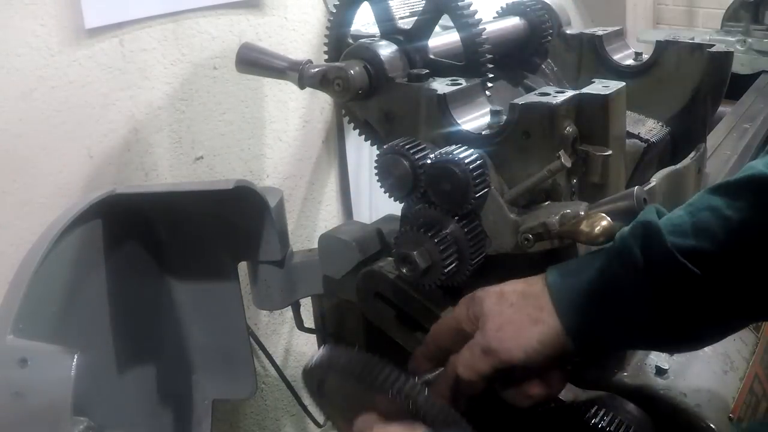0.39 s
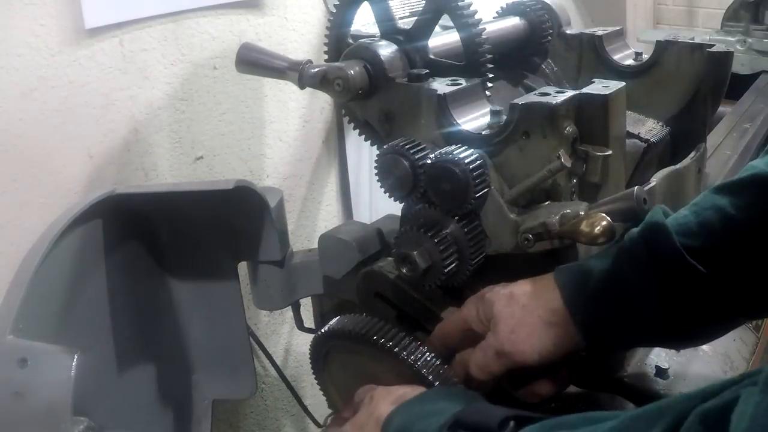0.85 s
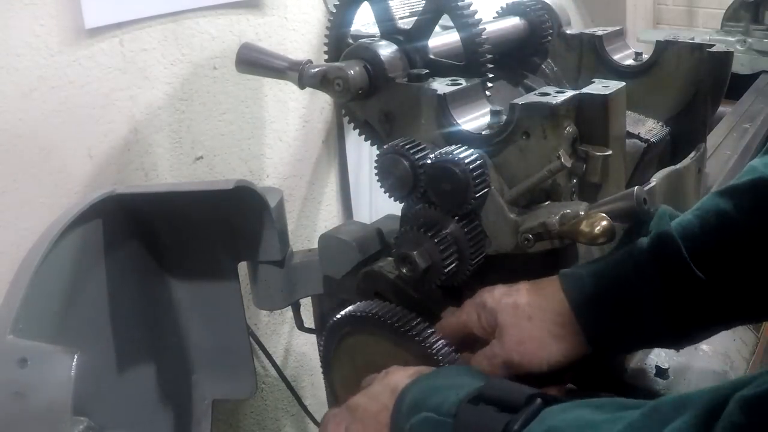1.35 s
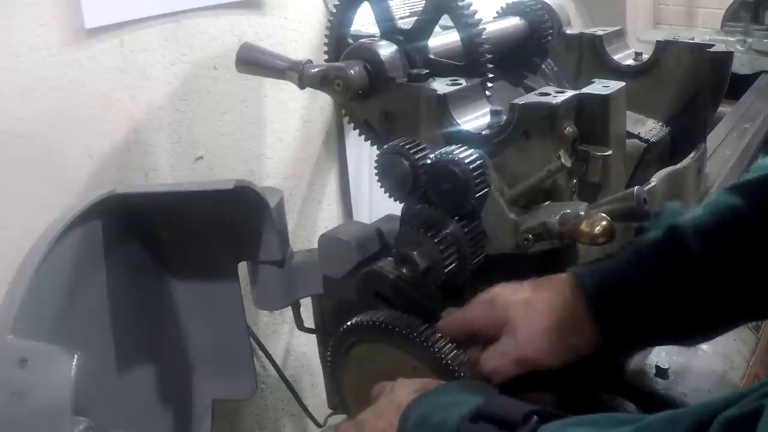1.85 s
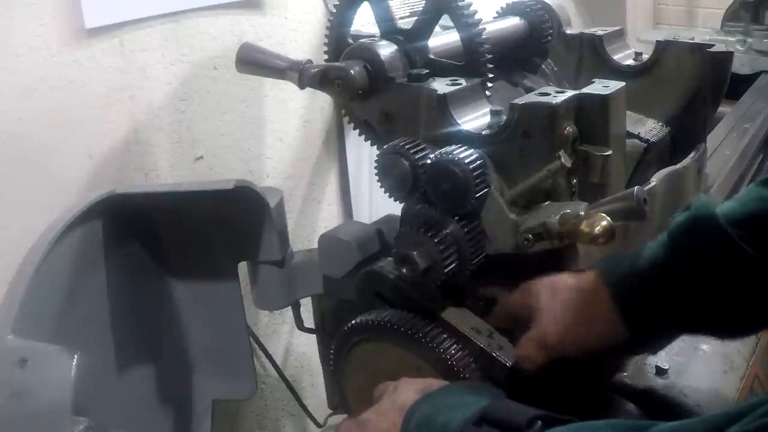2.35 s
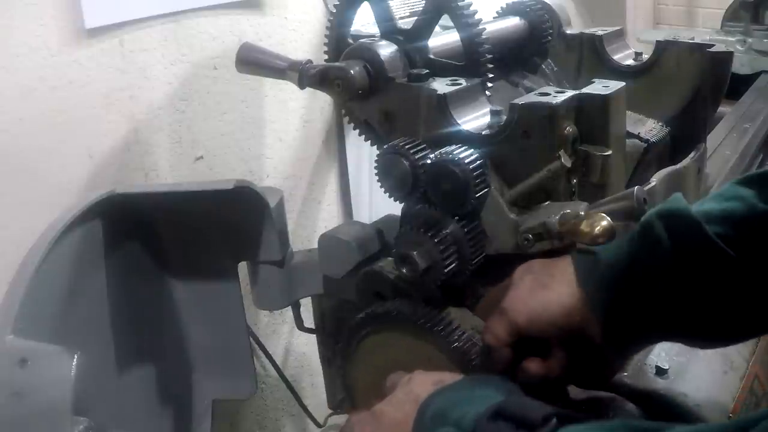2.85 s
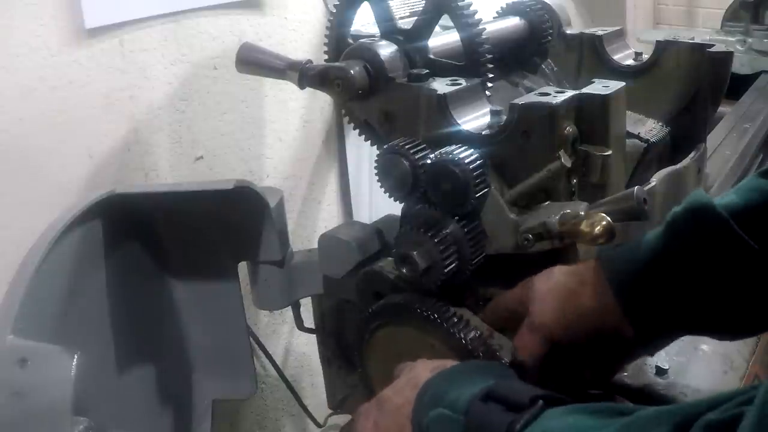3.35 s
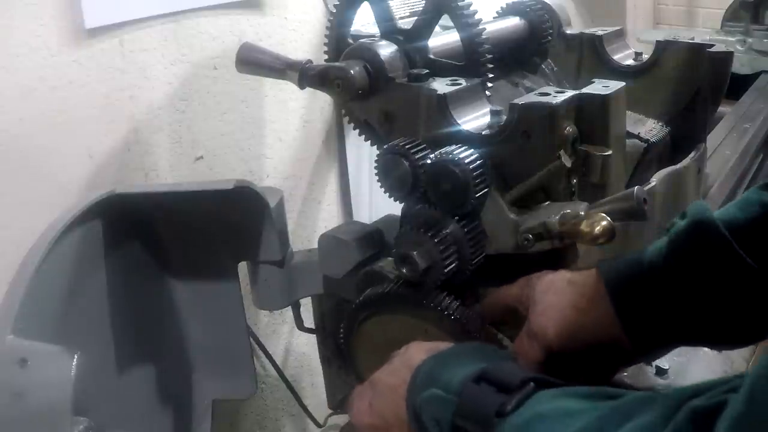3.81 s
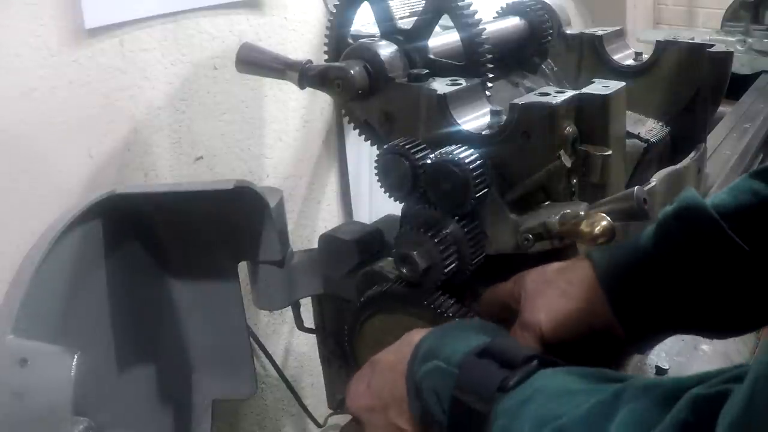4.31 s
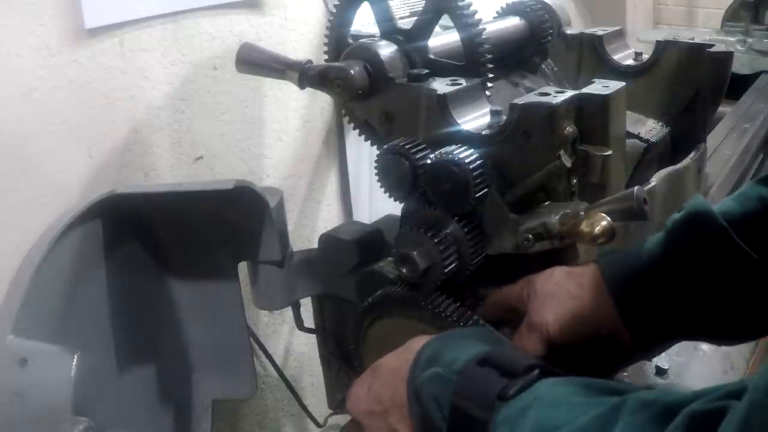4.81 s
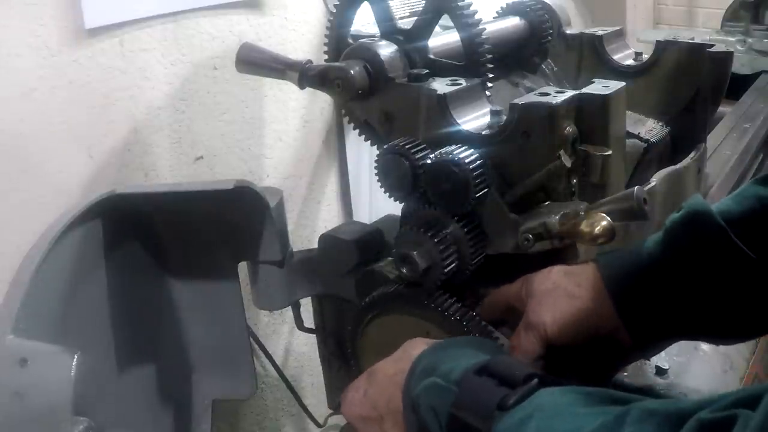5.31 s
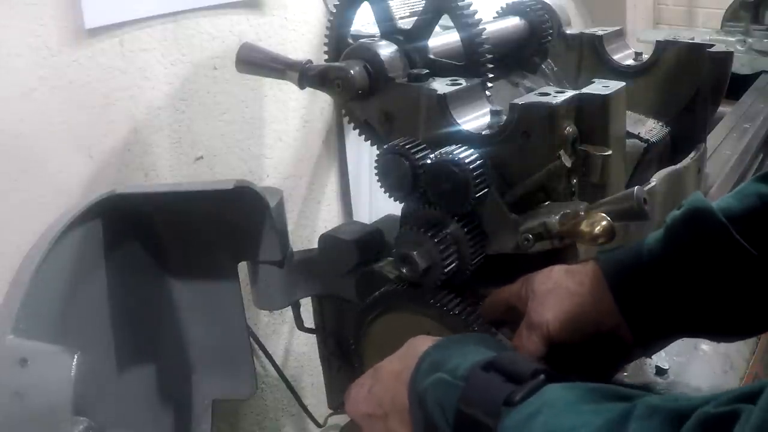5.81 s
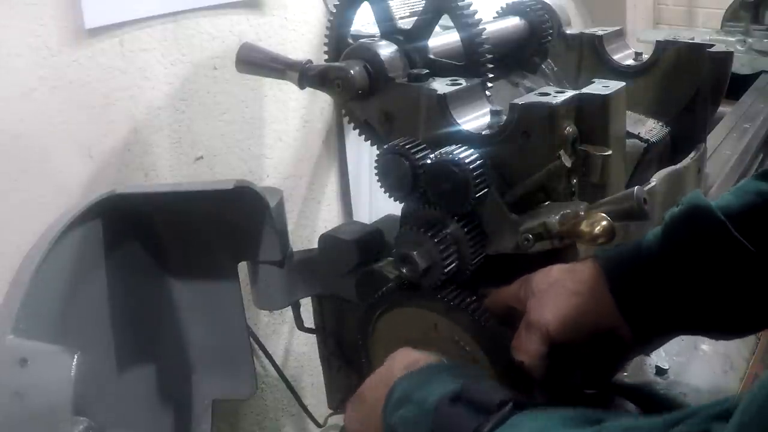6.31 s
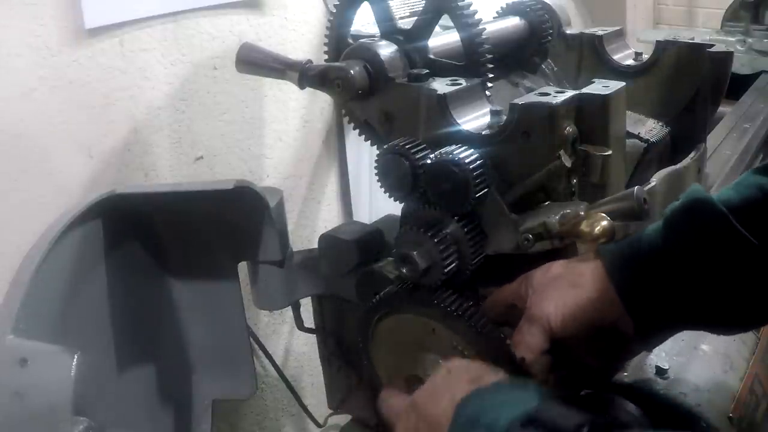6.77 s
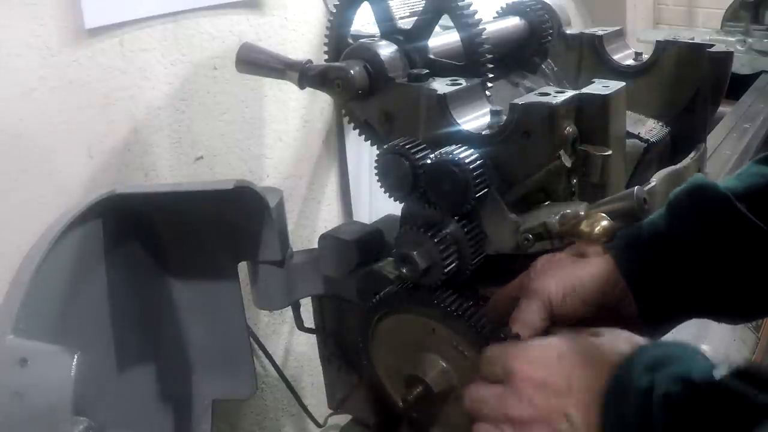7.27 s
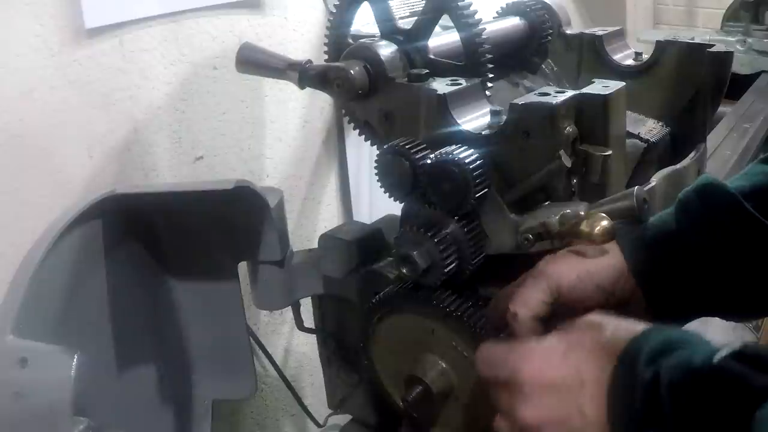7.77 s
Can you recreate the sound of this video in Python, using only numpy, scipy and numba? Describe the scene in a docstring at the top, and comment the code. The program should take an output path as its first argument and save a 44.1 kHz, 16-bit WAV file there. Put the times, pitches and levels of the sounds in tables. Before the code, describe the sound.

In a quiet workshop, hands fit a heavy metal gear onto a machine. Bright clinks and knocks come in the first second, then the hardest clack just before two seconds with gritty scraping and a soft puff of air. Sparse small taps, faint slides and cloth rustle follow, with one more sharp clink past six seconds. Close, slightly muffled microphone, steady hiss and faint room rumble.

```python
"""In a quiet workshop, hands fit a large cast gear onto the change-gear bracket of a lathe, close to a microphone.
Impacts excite decaying modes of the gear, a steel collar, the bracket and the machine frame, with cracks and thuds
of noise. Sliding metal is grainy friction noise that also drives some of these modes; sleeves, palms and pushed air
are shaped noise. The walls return a diffuse tail, and steady hiss over a faint room rumble lies under all."""
import sys
import numpy as np
from scipy import signal
from scipy.fft import rfft, irfft, next_fast_len
from scipy.io import wavfile
from scipy.ndimage import uniform_filter1d
from numba import njit

SR = 44100
rng = np.random.default_rng(int(sys.argv[2]) if len(sys.argv) > 2 else 0)


def gain_from_db(level_db):
    """Convert decibel levels to linear amplitude factors (20 dB per decade)."""
    decades = np.asarray(level_db, float) / 20
    return 10 ** decades


def to_wav(sig):
    """Store sig (one row per channel, or 1-D mono) as 16-bit WAV at the path in sys.argv[1].

    Samples outside -1..1 are clipped; the rate is SR.
    """
    pcm = np.clip(np.atleast_2d(sig), -1, 1) * 32767
    pcm = np.round(pcm).astype(np.int16)
    wavfile.write(sys.argv[1], SR, pcm.T)  # frames by channels


N = 358974  # length [samples]

# Levels in the tables are relative: the functions weight them further.
# Knocks on the bracket: (time [s], crack level [dB], brightness [dB/octave], ring level [dB], frame level [dB])
BRACKET_KNOCKS = [(0.1581, -45.5, -6, -62.5, -55.5), (0.525, -7.5, -2.5, -37, -39.5),
                  (0.5893, -13.5, -2.5, -45, -52), (1.6704, -54, -6, -73, -53.5),
                  (1.785, -36, 10.5, -78.5, -67), (1.797, -50, 3, -83.5, -56.5),
                  (1.8345, -46, -21, -70, -40.5), (1.861, -42.5, 15, -83.5, -76),
                  (1.906, -48.5, -2.5, -69.5, -54), (1.9411, 1.5, 4, -29.5, -34.5),
                  (1.9573, -13, 1, -36, -68), (2.755, -39.5, -6.5, -70, -62),
                  (2.8546, -23.5, -8, -49.5, -49.5), (3.0975, -38.5, -16.5, -81, -60.5),
                  (3.1603, -29.5, -5.5, -74, -51.5), (4.7211, -52, -5.5, -87, -57),
                  (6.3341, -36, -5, -57, -65), (6.6247, -45.5, 5, -85.5, -74),
                  (7.0485, -29, -5.5, -80, -43), (8.0803, -55, 2, -85, -57.5)]
# Gear clinks on the bracket:
# (time [s], crack level [dB], brightness [dB/octave], low ring level [dB], high ring level [dB])
GEAR_CLINKS = [(0.329, -41, -9.5, -66, -50), (0.386, -39, -8, -82, -55), (0.4987, -26.5, -10, -40, -19.5),
               (0.7856, -23, -2, -40.5, -49), (0.9931, -52, -11.5, -63, -73), (1.0914, -9, 9, -45, -26.5),
               (4.1097, -17.5, -1.5, -45, -61), (4.6764, -41, -9, -66, -88),
               (4.8816, -41, -9.5, -43, -81.5), (6.343, -7, 1.1, -38, -68)]
# Collar taps its stud: (time [s], crack level [dB], low ring level [dB], high ring level [dB], frame level [dB])
COLLAR_TAPS = [(3.5527, -43.5, -72.5, -60.5, -56), (3.756, -45, -71.5, -63, -45.5),
               (3.995, -41.5, -55, -72, -50), (5.2515, -55, -72, -49.5, -53),
               (5.3074, -38.5, -67, -62, -48), (5.7865, -31.5, -58, -47.5, -38),
               (6.0343, -32.5, -64, -46.5, -52), (6.0484, -16.5, -49.5, -53.5, -40),
               (6.099, -44.5, -45, -50, -41), (6.215, -55, -59, -54, -61), (6.275, -75, -85, -55, -70),
               (6.302, -75, -82, -50, -76), (6.868, -52, -74, -58, -55), (6.9032, -34, -55, -55.5, -42.5),
               (7.988, -69, -86.5, -69, -73.5)]
# Fingers close on the collar and damp its ring: (time [s])
COLLAR_GRIP_TIMES = [5.372, 5.96, 6.258]
# Metal slides on metal: (start [s], hold [s], level [dB], treble relative to it [dB])
METAL_SLIDES = [(0, 0.06, -57.5, -18), (0.13, 0.02, -60, -22), (0.429, 0.078, -48, -21),
                (0.686, 0.056, -59, -8), (1.052, 0.0093, -53, -15), (1.605, 0.096, -64.5, -4),
                (1.794, 0.019, -52.5, -4), (1.83, 0.068, -50, -1), (1.923, .03, -42, 11.5),
                (3.111, 0.062, -49.5, 13), (3.174, .11, -49.5, -10), (3.75, .03, -63, 4),
                (4.0, .11, -56.5, -0.5), (4.636, 0.031, -62.5, -2), (5.252, .012, -60, -7.5),
                (5.316, 0.0062, -49, -15), (5.748, 0.029, -54.5, -16), (6.056, 0.076, -53.5, -3),
                (6.92, .012, -51, -14), (7.15, 0.24, -79, 15.5), (7.308, .14, -63, -5)]
# A dragged edge keeps the gear rim singing: (start [s], hold [s], level [dB])
RIM_DRAGS = [(.455, 0.046, -43), (1.055, 0.0074, -58)]
# A dragged edge keeps the collar singing: (start [s], hold [s], level [dB])
COLLAR_DRAGS = [(3.545, 0.004, -59), (4.03, .06, -56.5), (5.25, 0.01, -56), (5.31, 0.028, -50),
                (5.755, 0.052, -52)]
# Palms on the iron make the frame rumble: (time [s], level [dB])
PALM_LEVELS = [(0.0, -60), (0.43, -62.5), (0.63, -51), (0.81, -67), (1.59, -65.5), (1.97, -57), (2.38, -71),
               (2.99, -66), (3.35, -59), (5.46, -76), (5.71, -69.5), (5.87, -71), (6.3, -54.5),
               (6.6, -89.5), (6.89, -68.5), (7.03, -55.5), (7.73, -74.5), (8.14, -68.5)]
# Sleeves brush past: (start [s], hold [s], level [dB])
SLEEVE_BRUSHES = [(0, 0.043, -58.5), (.26, 0.059, -61), (2.22, 0.1, -63), (2.6, 0.36, -61.5),
                  (7.3, 0.043, -67), (7.465, .012, -61.5), (7.62, 0.046, -59), (7.78, .012, -59.5),
                  (7.905, .012, -62.5), (8.1, .04, -63.5)]
# Air pushed onto the microphone: (time [s], level [dB])
AIR_LEVELS = [(1.9, -46), (1.974, -56), (2.166, -39.5), (2.272, -54.5), (2.55, -58.5)]

# Modes of the gear: (frequency [Hz], level [dB], decay by 60 dB [s])
GEAR_MODES = [(2440, 5, .05), (2449, -5, .3), (2484, -3, .34), (4145, -29, .28), (6207, -8, .22),
              (6240, 4, .06), (6268, -12, .26)]
# Modes of the steel collar: (frequency [Hz], level [dB], decay by 60 dB [s])
COLLAR_MODES = [(1701, 0, .5), (4153, 0, .38), (4350, -14, .02), (7480, -12, .12)]
# Modes of the bracket: (frequency [Hz], level [dB], decay by 60 dB [s])
BRACKET_MODES = [(1352, 0, .27), (1388, -3, .2), (1795, -7, .2), (1914, -7, .12), (2985, -13, .2),
                 (3425, -9, .25), (5090, -8, .06), (5276, 0, .17), (5300, -10, .4)]
# Modes of the machine frame: (frequency [Hz], level [dB], decay by 60 dB [s])
FRAME_MODES = [(114, -6, .35), (257, -7, .3), (305, -11, .15), (389, -5, .5), (435, -10, .1),
               (560, -14, .08)]
# Teeth and casting walls, damped almost at once: (frequency [Hz], level [dB], decay by 60 dB [s])
CASTING_MODES = [(1840, 0, .04), (2080, -4, .03), (2400, -1, .04), (3430, -3, .03), (4480, -5, .025),
                 (5450, -4, .025), (6250, -1, .03)]

# Spectrum of sliding metal: (frequency [Hz], relative density [dB])
SLIDE_SPECTRUM = [(300, -18.5), (600, -3), (1200, -1.5), (2000, -5.5), (2600, 3.5), (3000, -13.5),
                  (3500, -5.5), (4500, -5.5), (6300, -4), (9000, -13.5)]
# Spectrum of rustling cloth: (frequency [Hz], relative density [dB])
RUSTLE_SPECTRUM = [(1760, -33), (3000, -12), (3810, -7.5), (4620, -10), (5260, -3.5), (7120, -1.5),
                   (9000, -6.5), (11700, -42), (19800, -120)]
# Spectrum of palm rumble and thuds: (frequency [Hz], relative density [dB])
RUMBLE_SPECTRUM = [(60, -19.5), (115, 2), (170, -2), (255, 5.5), (390, 0.5), (500, -6), (700, -14.5),
                   (1100, -16), (2500, -60.5)]
# Spectrum of impact cracks: (frequency [Hz], relative density [dB])
CRACK_SPECTRUM = [(300, -30), (1000, -17), (1800, 7.5), (4000, 4), (6500, 5), (10000, 3), (13000, -14),
                  (15500, -8)]
# Spectrum of the steady noise common to both channels: (frequency [Hz], relative density [dB])
ROOM_SPECTRUM = [(12, -32.5), (20, 6.5), (47, 2), (122, 0), (185, -6), (393, -16.5), (439, -15.5),
                 (686, -20.5), (3170, -24), (5090, -22.5), (6540, -24), (7110, -20.5), (9130, -26.5),
                 (14300, -26.5), (15500, -29.5)]
# Spectrum of the faint steady hiss in opposite phase in the two channels:
# (frequency [Hz], relative density [dB])
SIDE_SPECTRUM = [(120, -31.5), (200, -2), (812, 1), (2250, -6), (6240, 0), (14400, 1), (15500, -17.5)]
# Spectrum of the wall reflections: (frequency [Hz], relative density [dB])
TAIL_SPECTRUM = [(200, -9), (700, -1), (2000, 2.5), (5500, -7), (7500, -6.5), (12000, -17)]

SCRAPE_RISE_DB_S, SCRAPE_FALL_DB_S = 553.5, 190.5  # how fast a slide sets in and dies
DRAG_RISE_DB_S, DRAG_FALL_DB_S = 340, 881
SLEEVE_RISE_DB_S, SLEEVE_FALL_DB_S = 171.5, 167.5
# grainy metal chatter just after each clink or knock, relative to the frame's jolt
CHATTER_DB, CHATTER_FALL_DB_S = -13.5, 86.5
SPECK_DB = 1.8  # mean lift of single specks of grit in a slide
BRACKET_HIGH_DB, BRACKET_SPAN_OCT = 2.5, 1.6  # brighter knocks reach the bracket's high modes
TAP_BRIGHT_DB_OCT = -4.5
# harder and duller clinks shake the frame more
CLINK_FRAME_DB, CLINK_FRAME_SLOPE, CLINK_FRAME_DULL_OCT = -24.5, 1.172, 1.74
CRACK_RISE_S = 0.0007
GEAR_SEATED_S = 1.5  # from here on the gear sits on its stud
GRIP_DB, COLLAR_FREE_DB = -45, -62  # force of the fingers; contact level that halves the collar's ring
TAIL_DB, TAIL_T60_S = -18, 0.39
ROOM_DB, SIDE_DB = -60, -77.5
MIC_HZ, MIC_DROP_DB, TOP_HZ = 6605, 23, 15300


def colour(x, points):
    """Linear filtering: shape x by (frequency [Hz], level [dB]) points and normalise to rms 1."""
    hz, db = np.transpose(points)
    size = next_fast_len(len(x))
    f = np.maximum(np.arange(size // 2 + 1) * SR / size, 1)
    gain = gain_from_db(np.interp(np.log(f), np.log(hz), db))
    y = irfft(rfft(x, size) * gain, size)[:len(x)]
    return y / np.sqrt(np.mean(y ** 2))


def tilted(points, db_per_octave, pivot_hz):
    """Spectral slope: lean a spectrum towards treble or bass about a pivot."""
    return [(hz, db + db_per_octave * np.log2(hz / pivot_hz)) for hz, db in points]


def curve(rows):
    """Amplitude envelope: gain along (time [s], level [dB]) points, silent outside them."""
    s, db = np.transpose(rows)
    return gain_from_db(np.interp(np.arange(N) / SR, s, db, left=-200, right=-200))


def walk(rate):
    """Slow random modulation: levels drawn at rate [Hz] and joined by slews; spread near 1."""
    k = int(SR / rate)
    held = np.repeat(rng.standard_normal(N // k + 1), k)
    return uniform_filter1d(held, k)[:N]


def grit(spread_db):
    """Stick-slip: noise of uneven grains, as rough faces catch and let go; rms 1."""
    x = rng.standard_normal(N) * gain_from_db(spread_db * walk(300) + spread_db * walk(40))
    return x / np.sqrt(np.mean(x ** 2))


def swells(rows, rise_db_s, fall_db_s):
    """Power addition: gain of gestures (start [s], hold [s], level [dB]) that rise, hold and die away."""
    t = np.arange(N) / SR
    power = np.zeros(N)
    for s, hold, db in rows:
        rise = rise_db_s * np.maximum(s - t, 0)
        fall = fall_db_s * np.maximum(t - s - hold, 0)
        power += gain_from_db(2 * (db - rise - fall))
    return np.sqrt(power)


def bursts(hits, points, pivot_hz, t60, rise):
    """High modal density: modes too many to tell apart make each (s, dB, dB/octave) hit a dying puff of noise."""
    t = np.arange(int(SR * t60)) / SR
    out = np.zeros(N + len(t))
    for s, db, bright in hits:
        puff = colour(rng.standard_normal(len(t)), tilted(points, bright, pivot_hz))
        envelope = gain_from_db(db - 60 * t / t60) * (1 - np.exp(-t / rise))
        out[int(s * SR):][:len(t)] += envelope * puff
    return out[:N]


@njit
def ring(poles, at, kicks, keep, rub, rub_gain):
    """Damped resonance: each contact damps what still rings, then kicks each mode; rubbing drives it on."""
    out = np.zeros(len(rub))
    for m in range(len(poles)):
        z, e = 0j, 0
        for i in range(len(rub)):
            while e < len(at) and at[e] <= i:
                z, e = z * keep[e] + kicks[e, m], e + 1
            z = z * poles[m] + rub_gain[m] * rub[i] + 1e-18
            out[i] += z.imag
    return out


def body(modes, hits, scatter_db, grip_db, rub, rub_db):
    """Modal superposition: (time [s], contact [dB], level per mode [dB]) hits; hard contacts damp the ring."""
    hz, mode_db, t60 = np.transpose(modes)
    decay = np.log(1000) / (np.maximum(t60, .01) * SR)
    poles = np.exp(2j * np.pi * hz / SR - decay)
    hits = sorted(hits, key=lambda h: h[0])
    chance = rng.standard_normal((len(hits), len(hz)))
    db = np.array([mode_db + h[2] for h in hits]) + scatter_db * chance
    kicks = gain_from_db(db) * (-1.) ** np.arange(len(hz))  # neighbouring modes start in opposite phase
    keep = np.array([1 / (1 + gain_from_db(h[1] - grip_db)) for h in hits])
    at = np.array([int(h[0] * SR) for h in hits])
    # noise bandwidth of a mode: scales its response to rubbing by the rms of rub
    rub_gain = gain_from_db(mode_db + rub_db) * np.sqrt(2 * (1 - abs(poles) ** 2))
    return ring(poles, at, kicks, keep, rub, rub_gain)


def part(modes, own, others, rub, rub_db, split_hz, grip_db, flutter_db):
    """Selective excitation: a part's own hits ring low and high modes apart, and the ring flutters in level."""
    high = np.array(modes)[:, 0] > split_hz
    hits = [(s, p, np.where(high, hi, lo)) for s, p, _, lo, hi, _ in own] + others
    return body(modes, hits, 1.0, grip_db, rub, rub_db) * gain_from_db(flutter_db * walk(45))


def contacts():
    """Impact: all blows as (s, crack dB, brightness dB/octave, low ring dB, high ring dB, frame dB)."""
    clinks = [(s, p, b, lo, hi, CLINK_FRAME_DB + CLINK_FRAME_SLOPE * p - CLINK_FRAME_DULL_OCT * b)
              for s, p, b, lo, hi in GEAR_CLINKS]
    knocks = [(s, p, b, r, r + BRACKET_HIGH_DB + BRACKET_SPAN_OCT * b, f) for s, p, b, r, f in BRACKET_KNOCKS]
    taps = [(s, p, TAP_BRIGHT_DB_OCT, lo, hi, f) for s, p, lo, hi, f in COLLAR_TAPS]
    return clinks, knocks, taps


def steady_noise():
    """Stationary random noise: hiss and room rumble, plus a faint hiss in opposite phase in the two channels."""
    floor = colour(rng.standard_normal(N), ROOM_SPECTRUM) * gain_from_db(ROOM_DB + 0.62 * walk(2.124))
    side = gain_from_db(SIDE_DB) * colour(rng.standard_normal(N), SIDE_SPECTRUM)
    return floor + side * np.array([[1], [-1]])


def scraping(blows):
    """Dry friction: rough faces catch and slip, and chatter after a blow, with a dull and a bright share."""
    chatter = swells([(s + 0.0052, 0, f + CHATTER_DB) for s, *_, f in blows], 3000, CHATTER_FALL_DB_S)
    dull_rows = [(s, hold, db) for s, hold, db, _ in METAL_SLIDES]
    bright_rows = [(s, hold, db + up) for s, hold, db, up in METAL_SLIDES]
    dull = swells(dull_rows, SCRAPE_RISE_DB_S, SCRAPE_FALL_DB_S)
    bright = swells(bright_rows, SCRAPE_RISE_DB_S, SCRAPE_FALL_DB_S)
    specks = gain_from_db(SPECK_DB * rng.exponential(size=N))
    noise = colour(grit(3.4) * specks, SLIDE_SPECTRUM)
    low = signal.sosfilt(signal.butter(4, 3200, fs=SR, output="sos"), noise)
    high = signal.sosfilt(signal.butter(4, 3200, "high", fs=SR, output="sos"), noise)
    return np.hypot(dull, chatter) * low + np.hypot(bright, chatter) * high * gain_from_db(-2.5)


def sleeve_rustle():
    """Cloth friction: sleeves brushing past make uneven, mostly high noise."""
    return swells(SLEEVE_BRUSHES, SLEEVE_RISE_DB_S, SLEEVE_FALL_DB_S) * colour(grit(1.5), RUSTLE_SPECTRUM)


def palm_rumble():
    """Structure-borne noise: palms on the iron make an uneven low rumble."""
    return curve(PALM_LEVELS) * colour(grit(4.1), RUMBLE_SPECTRUM) * gain_from_db(0.5)


def frame_ring(clinks, knocks, taps):
    """Low-frequency modes: blows and rubbing palms shake the machine frame."""
    rub = curve(PALM_LEVELS) * grit(2.5)
    octaves = np.log2(np.array(FRAME_MODES)[:, 0] / 280)
    hits = [(s, p, f + 4 * octaves) for s, p, *_, f in clinks + knocks]
    # the stud shakes the bed more than the bracket does, so taps thud lower
    hits += [(s, p, f - 3 * octaves) for s, p, *_, f in taps]
    return body(FRAME_MODES, hits, 2.3, 8.5, rub, -9.5) * gain_from_db(-2.0 + 2.5 * walk(30))


def casting_ring(clinks, knocks, taps, slide):
    """Heavy damping: blows and sliding excite short-lived modes of the teeth and casting walls."""
    octaves = np.log2(np.array(CASTING_MODES)[:, 0] / 3000)
    hits = [(s, p, p - 22 + b * octaves) for s, p, b, *_ in knocks + taps]
    hits += [(s, p, p - 26 + b * octaves) for s, p, b, *_ in clinks]
    return body(CASTING_MODES, hits, 3.0, 0, slide, -20.5)


def bracket_ring(clinks, knocks, slide):
    """Energy transfer: knocks and sliding ring the bracket, and the gear passes on part of its blow."""
    passed_on = [(s, p, f - 8) for s, p, *_, f in clinks]
    return part(BRACKET_MODES, knocks, passed_on, slide, -36.5, 4000, -29.0, 2.5)


def impact_crack(blows):
    """Broadband impulse: each blow gives a short snap and a longer crack of noise."""
    snaps = [(s, p - 5, b) for s, p, b, *_ in blows]
    cracks = [(s, p - 10, b) for s, p, b, *_ in blows]
    snap = bursts(snaps, CRACK_SPECTRUM, 3000, 0.012, CRACK_RISE_S / 2)
    return snap + bursts(cracks, CRACK_SPECTRUM, 3000, 0.037, CRACK_RISE_S)


def impact_thud(blows):
    """Low-frequency radiation: each blow on the frame leaves a dying puff of low noise."""
    return bursts([(s, f - 3, 1.5) for s, *_, f in blows], RUMBLE_SPECTRUM, 280, 0.41, 0.0013)


def gear_ring(clinks, knocks):
    """Free vibration: clinks and dragged edges ring the gear, chiefly the rim modes under drag."""
    rub = swells(RIM_DRAGS, DRAG_RISE_DB_S, DRAG_FALL_DB_S) * grit(6.2)
    rim_modes = np.array(GEAR_MODES)[:, 0] > 5000
    # a knock on the bracket jolts the rim of the gear while it still hangs loose
    jolts = [(s, p, np.where(rim_modes, p - 17, p - 40)) for s, p, *_ in knocks if s < GEAR_SEATED_S]
    return part(GEAR_MODES, clinks, jolts, rub, np.where(rim_modes, 1.5, -22), 3000, -48.5, 4.5)


def collar_ring(clinks, taps):
    """Contact damping: taps and dragged edges ring the collar; clinks and closing fingers damp it."""
    rub = swells(COLLAR_DRAGS, DRAG_RISE_DB_S, DRAG_FALL_DB_S) * grit(3.0)
    rub_db = np.array([-17, -10.5, 7.5, 13])  # one per mode
    dampers = [(s, p, -120) for s, p, *_ in clinks]
    dampers += [(s, GRIP_DB, -120) for s in COLLAR_GRIP_TIMES]
    return part(COLLAR_MODES, taps, dampers, rub, rub_db, 3000, COLLAR_FREE_DB, 3.5)


def metal():
    """Superposition: every contact cracks in the casting and rings the parts it touches."""
    clinks, knocks, taps = contacts()
    blows = clinks + knocks + taps
    slide = scraping(clinks + knocks)
    frame = frame_ring(clinks, knocks, taps)
    casting = casting_ring(clinks, knocks, taps, slide)
    bracket = bracket_ring(clinks, knocks, slide)
    gear = gear_ring(clinks, knocks)
    collar = collar_ring(clinks, taps)
    impacts = impact_crack(blows) + impact_thud(blows)
    return impacts + casting + gear + bracket + collar + frame + slide * gain_from_db(-2.5)


def air_buffet():
    """Turbulent pressure: moving arms push air onto the microphone, heard as low noise."""
    spectrum = [(15, -8.0), (40, -5), (80, -8.0), (150, -19.5), (400, -40.5)]
    return curve(AIR_LEVELS) * colour(grit(2.8), spectrum)


def shop(x):
    """Reverberation: a diffuse return from the walls builds up over the first milliseconds, then decays."""
    t = np.arange(SR // 2) / SR
    envelope = gain_from_db(-60 * t / TAIL_T60_S) * (1 - np.exp(-t / .004))
    tail = colour(rng.standard_normal(len(t)), TAIL_SPECTRUM) * envelope
    tail /= np.sqrt(np.sum(tail ** 2))  # unit energy
    return x + gain_from_db(TAIL_DB) * signal.fftconvolve(x, tail)[:N]


def scene():
    """Monophonic pickup: one close microphone, copied to both channels."""
    hands = sleeve_rustle() + palm_rumble() + air_buffet()
    return np.tile(shop(metal()) + hands, (2, 1))


def top_cut(x):
    """Nothing passes above the cut-off."""
    return signal.sosfilt(signal.butter(12, 16290, fs=SR, output="sos"), x)


def record(dry):
    """Transmission loss: the sealed housing dulls the treble; steady noise is added and the band limited."""
    low_pass = signal.butter(8, MIC_HZ, fs=SR, output="sos")
    leak = gain_from_db(-MIC_DROP_DB)  # share that passes at all frequencies
    housed = leak * dry + (1 - leak) * signal.sosfiltfilt(low_pass, dry)
    band_limit = signal.ellip(8, .2, 70, TOP_HZ, fs=SR, output="sos")
    mix = signal.sosfilt(band_limit, housed + steady_noise())
    return top_cut(mix)


dry = scene()
out = record(dry)
to_wav(out)
```